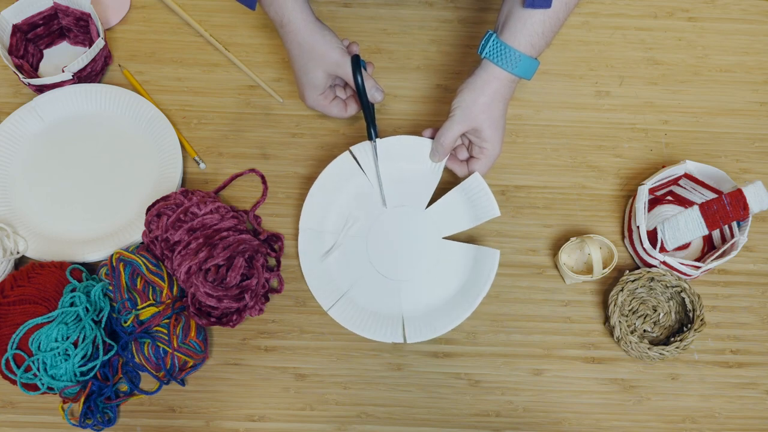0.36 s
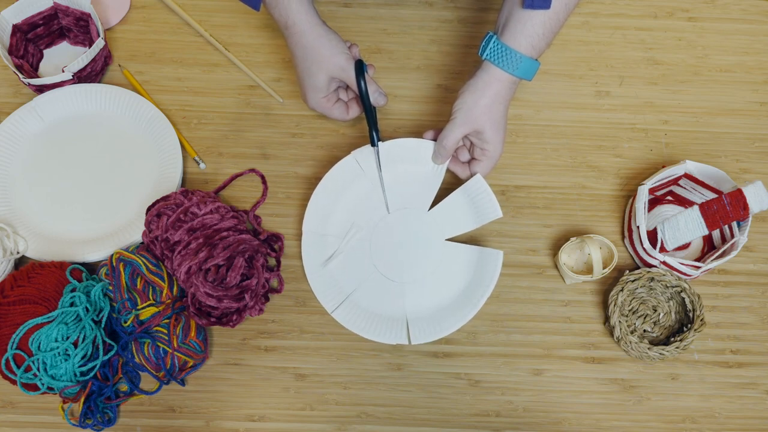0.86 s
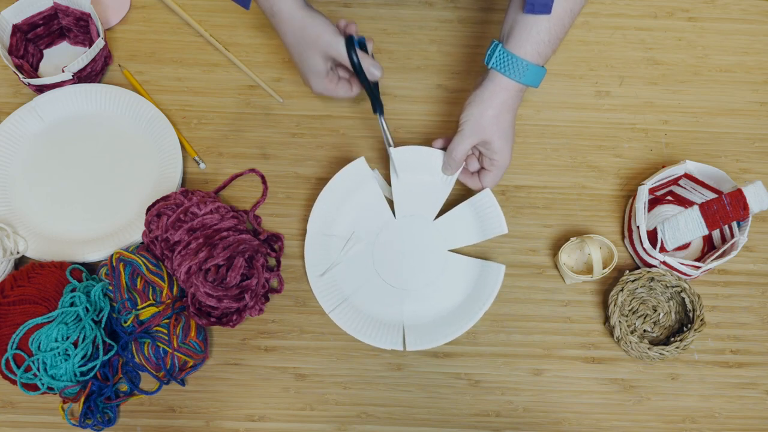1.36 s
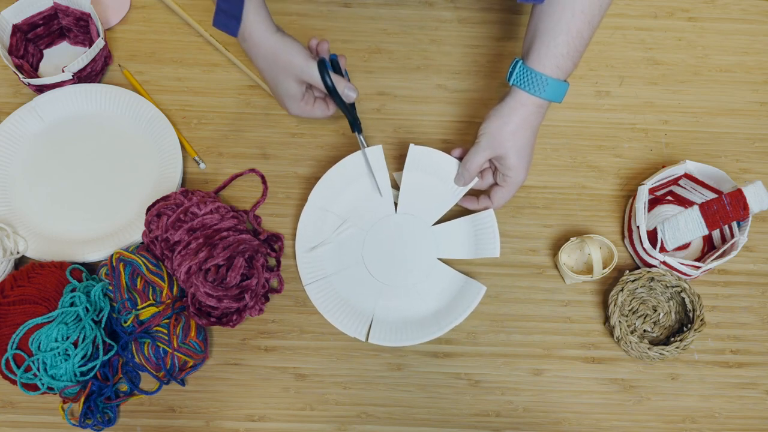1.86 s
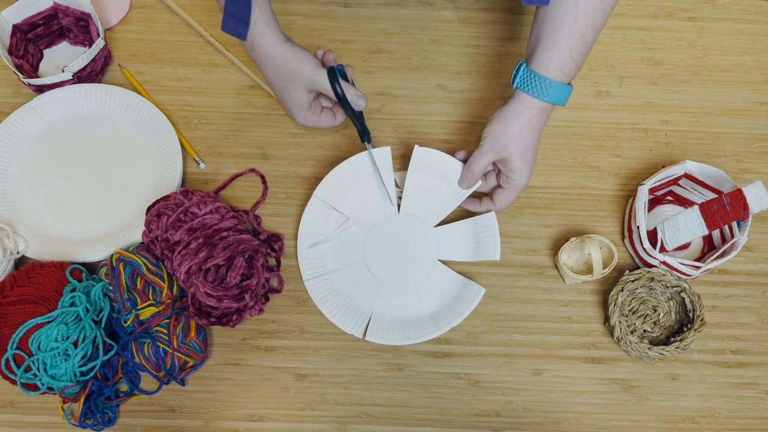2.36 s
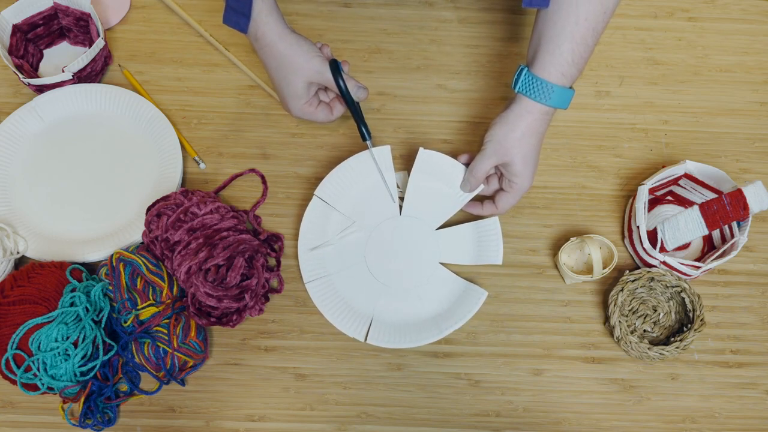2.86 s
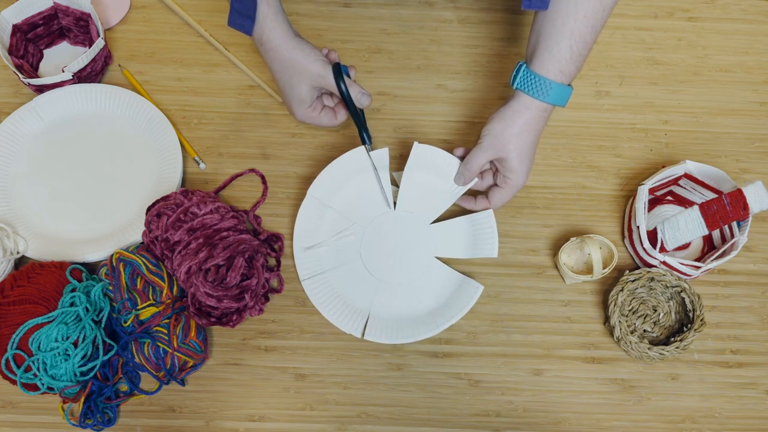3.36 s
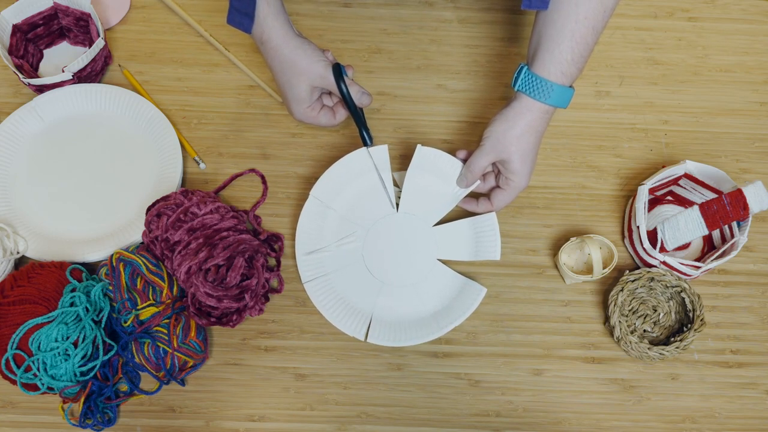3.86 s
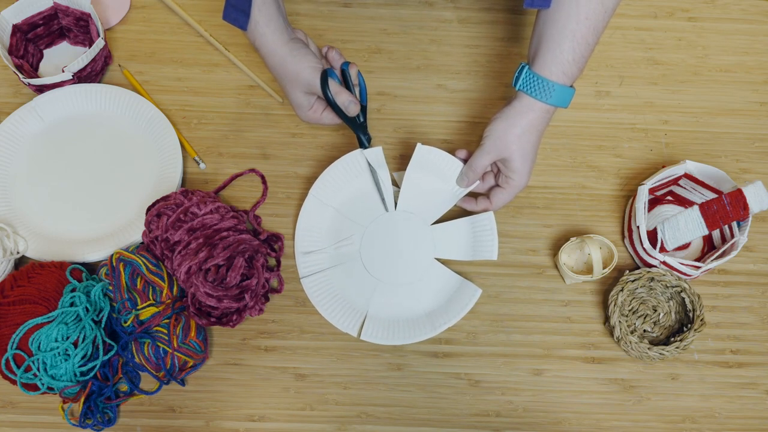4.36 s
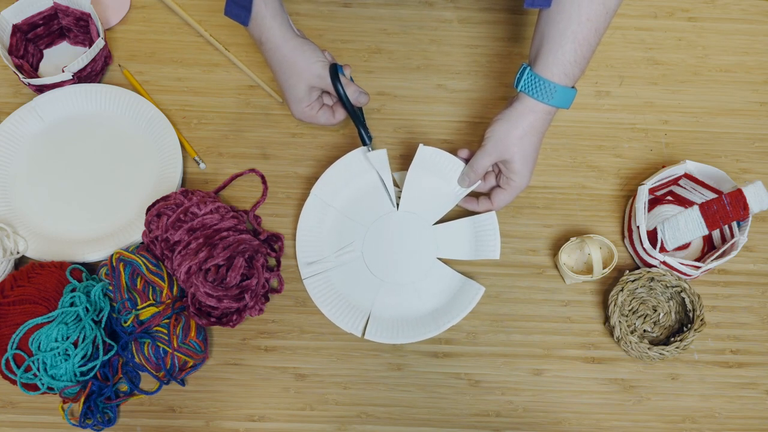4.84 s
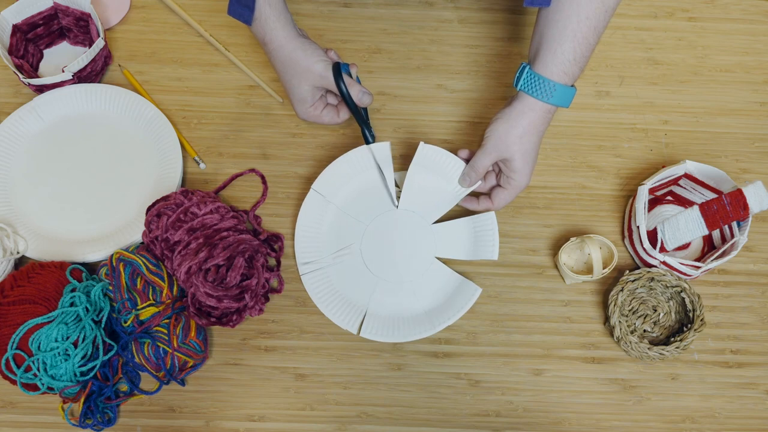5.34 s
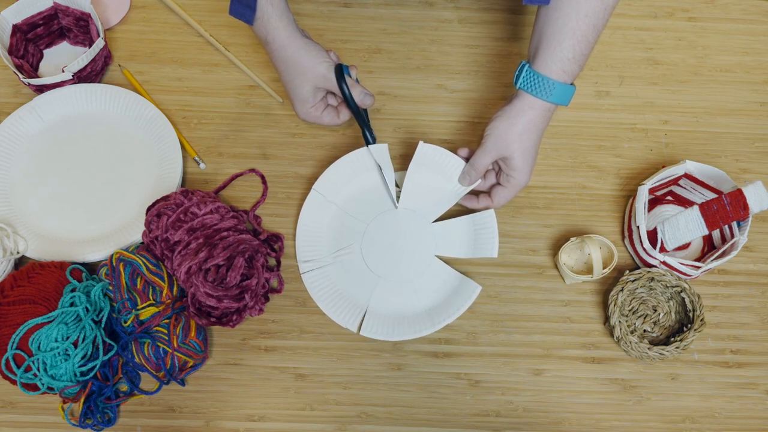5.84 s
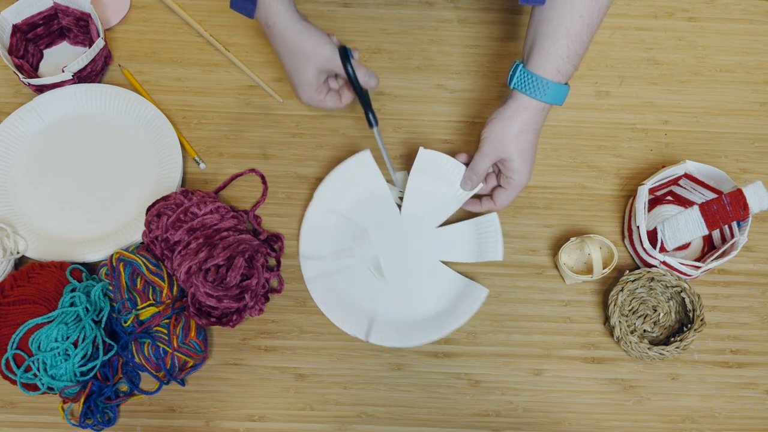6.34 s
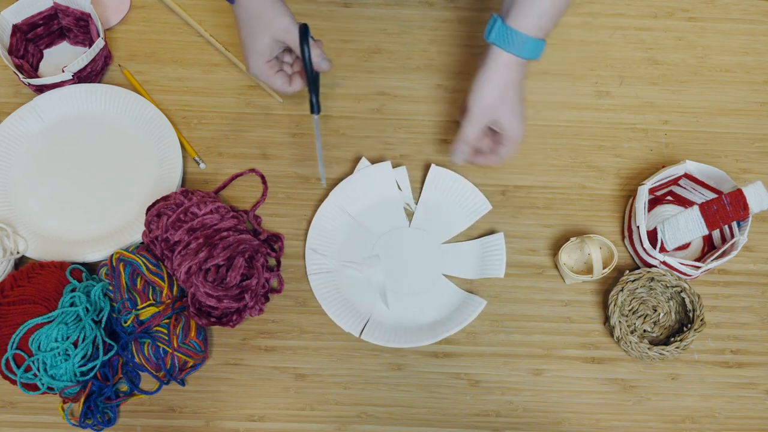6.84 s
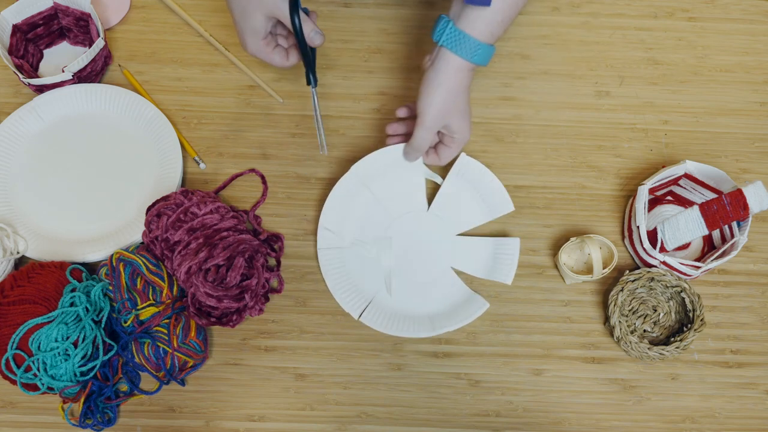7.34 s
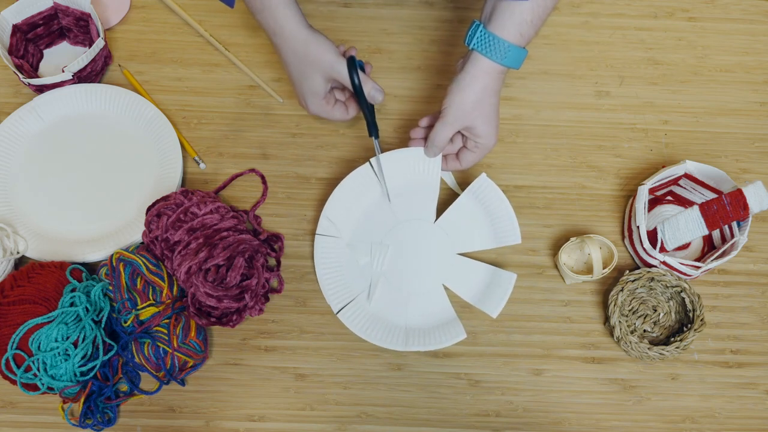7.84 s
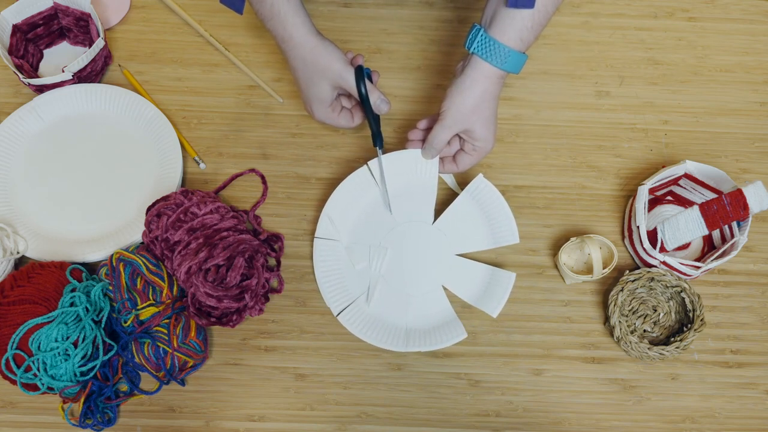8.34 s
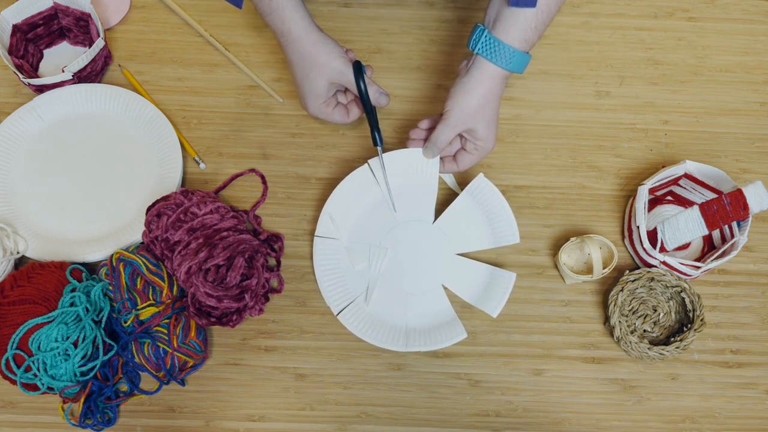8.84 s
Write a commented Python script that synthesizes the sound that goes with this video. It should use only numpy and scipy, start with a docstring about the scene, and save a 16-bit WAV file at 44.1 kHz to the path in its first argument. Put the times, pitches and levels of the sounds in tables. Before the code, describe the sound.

Stiff card is cut in irregular bursts: small fibrous cracks quicken into a hard snip, then dry scraping and handling rustle. Strong isolated snaps come mid-way, and the last seconds are mostly quieter friction with one small table knock and a faint run of crackles. Mono, close microphone, short room reflections, very low background noise and hum.

```python
"""Scissors work through a stiff paper plate on a wooden table in a quiet room.
The blades stick and slip, so the card parts in short cracks: bursts of fibre snaps into resonances.
Between them card rubs on steel and wood: dense grains of friction into the same resonances.
Both excite a short diffuse room tail, over soft table bumps, room noise and a low ventilation hum."""
import sys
import numpy as np
from scipy import signal
from scipy.fft import rfft, irfft, next_fast_len
from scipy.io import wavfile

SR = 44100
rng = np.random.default_rng(int(sys.argv[2]) if len(sys.argv) > 2 else 0)


def amp(db):
    return 10 ** (np.asarray(db, float) / 20)


def wav_out(sig):
    """Save sig, one row per channel (or a flat mono array), as 16-bit PCM at SR to the path in sys.argv[1]."""
    wavfile.write(sys.argv[1], SR, np.round(np.clip(np.atleast_2d(sig).T, -1, 1) * 32767).astype(np.int16))


N = 406161

# plate resonances: (frequency [Hz], width [Hz], relative gain [dB])
BODY_MODES = [(321.6, 80, 0.5), (680, 140, 1.5), (916, 83, 5.5), (1590, 900, 6), (1963, 780, 1.5)]
TREBLE_MODES = [(2860, 1400, 5.5), (4300, 2520, 10), (5000, 870, 10.5), (6370, 1360, 1), (8630, 2800, 1.5)]
# strokes, each until the next: (start [s], low ring [Hz], high ring [Hz], share of chatter [0-1])
STROKES = [(0, 970, 5115, 0.4), (0.13, 1594, 3890, 0), (.7, 1385, 5095, 0.2), (1.228, 1454, 3470, 0.08),
           (2.299, 2178, 3100, 0.3), (2.65, 908, 5100, 0.4), (3.019, 1460, 3300, 0.06),
           (3.551, 871, 5000, .5), (3.758, 2030, 3450, 0.02), (3.9, 1436, 3450, 0.08), (6.1, 900, 4410, 0),
           (6.28, 1640, 3400, 0.12), (6.999, 2300, 4340, 0.05), (7.629, 1490, 3660, 0.19),
           (8.429, 1653, 4900, 0.3), (9.08, 1670, 4300, 0.05)]
# flap beside the blades, rings higher as a cut shortens it:
# (start [s], end [s], start pitch [Hz], end pitch [Hz], ring gain [dB re body])
FLAPS = [(0.633, 0.964, 253, 440, -10), (2.57, 2.68, 720, 960, -5), (2.87, 2.96, 580, 1100, -6),
         (3.6, 3.74, 505, 950, -9), (8.69, 9.03, 620, 720, -11)]
FLAP_SHARPNESS = 13.5  # pitch over width


def rms_one(x):
    """Scale to an rms of 1."""
    return x / np.sqrt(np.mean(x ** 2) + 1e-20)


def top_one(x):
    """Scale to a peak of 1."""
    return x / np.max(np.abs(x))


def resonance(x, hz, width_hz):
    """Two-pole band with gain 1 on top."""
    r = np.exp(-np.pi * width_hz / SR)
    feedback = [1, -2 * r * np.cos(2 * np.pi * hz / SR), r * r]
    return signal.lfilter([(1 - r * r) / 2, 0, (r * r - 1) / 2], feedback, x)


def plate(x, modes, offsets_db):
    """Parallel resonances with alternating signs, each with its own gain offset."""
    out = 0
    for k, ((hz, width_hz, db), offset_db) in enumerate(zip(modes, offsets_db)):
        out = out + (-1) ** k * amp(db + offset_db) * resonance(x, hz, width_hz)
    return out


def drift(rate_hz):
    """Slow random wander of rms 1: noise through a double one-pole low-pass."""
    r = np.exp(-2 * np.pi * rate_hz / SR)
    settled = signal.lfilter([1], [1, -2 * r, r * r], rng.standard_normal(N + SR))[SR:]
    return rms_one(settled)


def swell(t_s, length_s):
    """Smooth rise to a top of 1 after half the length, then a fall."""
    u = 2 * t_s / length_s
    return (u * np.exp(1 - u)) ** 2


def air():
    """Steady room noise of a shaped spectrum and a slightly wavering mains hum."""
    # noise spectrum: (frequency [Hz], relative density [dB per Hz])
    spectrum = [(43, -11.5), (70, -17), (92, -6.5), (111, -13), (134, -8.5), (277, -5.5), (373, -12),
                (560, -18), (775, -16), (6740, -39.5), (16000, -43.5)]
    noise_rms_db = -62.5
    hum_hz, hum_rms_db, waver_db = 100, -73, 0.68
    hz, db = np.transpose(spectrum)
    size = next_fast_len(N)
    bins_hz = np.maximum(np.fft.rfftfreq(size, 1 / SR), 1)
    shape = amp(np.interp(np.log(bins_hz), np.log(hz), db))
    noise = irfft(rfft(rng.standard_normal(size)) * shape, size)[:N]
    sine = np.sqrt(2) * np.sin(2 * np.pi * hum_hz * np.arange(N) / SR)
    hum = sine * amp(hum_rms_db + waver_db * drift(2.5))
    return amp(noise_rms_db) * rms_one(noise) + hum


def bumps():
    """Low rumble when an arm or the plate shifts on the table: swells of narrow-band noise."""
    # bumps: (start [s], rms at the top [dB], twice the rise time [ms], pitch [Hz])
    bump_events = [(2.67, -52.5, 135, 151), (3.148, -52.5, 79, 182), (4.52, -57, 146, 105.6),
                   (8.021, -46.5, 15, 289), (8.119, -56, 120, 100)]
    t_s, out, shake = np.arange(N) / SR, 0, rng.standard_normal(N)
    for start_s, db, ms, hz in bump_events:
        wood = rms_one(resonance(resonance(shake, hz, 80), hz, 80))
        out = out + amp(db) * swell(np.maximum(t_s - start_s, 0), ms / 1000) * wood
    return out


def room(x):
    """Diffuse tail: the power of each band builds up and dies away as noise, the treble sooner."""
    bass_t60_s, twice_as_fast_hz, build_s = 0.2, 18000, 0.00083
    edges_hz, out = 200 * 2 ** np.arange(0, 6.5, 0.75), 0
    build = np.exp(-1 / (build_s * SR))
    diffuse = rng.standard_normal((2, N))
    for k, (low, high) in enumerate(zip(edges_hz, edges_hz[1:])):
        band = signal.butter(2, [low, high], "band", fs=SR, output="sos")
        # -120 in amp() is 60 dB of power
        fade = amp(-120 * (1 + (low / twice_as_fast_hz) ** 2) / (bass_t60_s * SR))
        power = signal.lfilter([1 - build], [1, -build], signal.sosfilt(band, x) ** 2)
        power = signal.lfilter([1 - fade], [1, -fade], power)
        out = out + np.sqrt(power) * rms_one(signal.sosfilt(band, diffuse[k % 2]))
    return out


def chatter():
    """Uneven slips, each with a force of its own; rms 1."""
    slips_per_s, rate_spread_db, force_spread_db = 55, 3.3, 2.2
    turns = np.cumsum(slips_per_s * amp(rate_spread_db * drift(27.75))) / SR
    force = amp(rng.normal(0, force_spread_db, SR))[turns.astype(int)]
    return rms_one(force * np.sin(np.pi * (turns % 1) ** 0.3) ** 6)


def pressure(t_s):
    """Treble and body levels in dB: each rub sets in, runs and lets go; the loudest one rules."""
    # rubs of card on blades or table:
    # (start [s], end [s], treble at start [dB], treble at end [dB], body [dB re treble])
    rubs = [(0.0, 0.102, -50, -51, -1.5), (0.262, 0.423, -46.5, -50.5, -2), (0.48, 0.548, -50.5, -57, 1.5),
            (0.64, 0.925, -63, -58, 4), (0.964, 1.205, -64, -52.5, 6.5), (1.235, 1.375, -42, -48, -5.5),
            (1.43, 1.444, -38.5, -48, -3), (1.536, 1.674, -48, -47, -5.5), (2.06, 2.072, -61, -58.5, -1),
            (2.41, 2.975, -57, -44.5, -4), (2.987, 3.065, -48, -55, -3.5), (3.093, 3.26, -54, -54, 5),
            (3.306, 3.308, -52, -53.5, 8.5), (3.34, 3.53, -62.5, -69, 4), (3.573, 3.781, -60, -43, 4.5),
            (3.932, 4.02, -55, -60, 0), (4.123, 4.197, -61, -50, -3.5), (4.233, 4.258, -51, -46, 4),
            (4.275, 4.4, -56, -59, -3), (4.458, 4.622, -51.5, -55.5, 2.5), (4.695, 4.716, -58, -57, 5),
            (4.975, 5.08, -43.5, -58.5, -6), (5.11, 5.238, -55, -57.5, 4), (5.323, 5.5, -57, -73, 0.5),
            (5.595, 5.73, -63, -64, 0), (6.208, 6.302, -42, -52, 3.5), (6.354, 6.445, -51, -41.5, -1.5),
            (6.522, 6.825, -53, -62.5, -4.5), (7.135, 7.32, -57, -50.5, -12), (7.333, 7.37, -46, -44.5, -5),
            (7.4, 7.5, -52, -48.5, -1), (7.498, 7.544, -51, -40, -5), (7.568, 7.776, -52.5, -68, 0.5),
            (7.797, 7.928, -57.5, -65, -5), (7.956, 8.162, -54, -66.5, -6), (8.196, 8.291, -62, -57, -2),
            (8.31, 8.442, -69, -56.5, -14), (8.476, 8.64, -58, -51, -10), (8.673, 8.875, -55.5, -56, -6),
            (8.91, 9.02, -56, -53, 3), (9.128, 9.153, -44, -41.5, -5.5), (9.166, 9.21, -45, -54, -1.5)]
    press_db_per_s, lift_db_per_s = 699.5, 275
    treble_db, body_db = -69, -82  # faint contact of the held plate
    for start, end, start_db, end_db, tilt_db in rubs:
        course_db = np.interp(t_s, [start, max(end, start + 1 / SR)], [start_db, end_db])
        onset_db = press_db_per_s * np.maximum(start - t_s, 0)
        release_db = lift_db_per_s * np.maximum(t_s - end, 0)
        db = course_db - onset_db - release_db
        treble_db = np.maximum(treble_db, db)
        body_db = np.maximum(body_db, db + tilt_db)
    return treble_db, body_db


def rubbing():
    """Dense clumped grains of friction ring in the plate, the part held free and the flap."""
    grains_per_s, grain_db, clump_db, clump_hz = 6000, 3.38, 1.3, 49
    ticks_per_s, tick_gain_db, tick_hz = 30, 21, 8500  # stray fibres flick off the rubbing edge
    colour_db, colour_hz = 2.2, 9.3  # the bending card shifts the strength of each resonance
    low_ring_db, high_ring_db, flap_rub_db = 12.5, 10.5, 16
    friction_cut_hz = 11000  # friction is duller than a crack
    t_s = np.arange(N) / SR
    treble_db, body_db = pressure(t_s)
    strokes = np.array(STROKES)
    stroke = np.searchsorted(strokes[1:, 0], t_s)
    share = np.clip(strokes[stroke, 3], 0, 1)

    sizes = amp(grain_db * np.minimum(rng.exponential(1, N), 5)) * rng.choice([-1, 1], (2, N))
    grains = sizes * (rng.random(N) < grains_per_s / SR) * amp(clump_db * drift(clump_hz))
    grains = grains * (1 - share + share * chatter())
    flicks = sizes[0] * (rng.random(N) < ticks_per_s / SR)
    ticks = resonance(resonance(flicks, tick_hz, tick_hz / 2), tick_hz, tick_hz)
    ticks = amp(tick_gain_db) * ticks

    shifts_db = [colour_db * drift(colour_hz) for _ in BODY_MODES + TREBLE_MODES]
    body = plate(grains[0], BODY_MODES, shifts_db)
    treble = plate(grains[1], TREBLE_MODES, shifts_db[len(BODY_MODES):])
    for k, (start, low_hz, high_hz, _) in enumerate(STROKES):
        held = slice(round(max(start, 0) * SR), np.searchsorted(stroke, k + 1))
        body[held] += amp(low_ring_db) * resonance(grains[1, held], low_hz, 150)
        treble[held] += amp(high_ring_db) * resonance(grains[1, held], high_hz, 450)
    for start, end, from_hz, to_hz, flap_db in FLAPS:
        held = slice(round(start * SR), round(end * SR))
        pitch_hz = np.interp(t_s[held], [start, end], [from_hz, to_hz])
        # gliding resonance: shift down to 0 Hz, low-pass, shift back
        turns = np.exp(2j * np.pi * np.cumsum(pitch_hz) / SR)
        r = np.exp(-np.pi * from_hz / FLAP_SHARPNESS / SR)
        glide = 2 * (turns * signal.lfilter([1 - r], [1, -r], grains[1, held] / turns)).real
        body[held] += amp(flap_db + flap_rub_db) * glide
    soft = signal.lfilter(*signal.butter(2, friction_cut_hz, fs=SR), treble)
    return amp(body_db) * rms_one(body) + amp(treble_db) * (rms_one(soft) + ticks)


def cracks(size=2600):
    """Each slip tears fibres for a few ms; the burst rings in the torn edge, plate and flap."""
    # cracks: (start [s], treble peak [dB], body peak before flex and flap [dB re treble],
    #          optional torn-edge ring [Hz], else the high ring of the stroke)
    crack_events = [(0.094, -42, 3), (0.126, -27.5, -3.5), (0.367, -48, 11), (0.395, -39, 1),
                    (0.468, -30, -7, 6450), (0.489, -38, -3), (0.6461, -48, 15), (0.7145, -33, -4),
                    (0.749, -36, -1), (0.772, -42, 3), (0.7921, -33, 3), (0.817, -35, 0), (0.842, -43, 3),
                    (0.863, -32, -1), (0.9084, -33.5, -2.5), (0.944, -30, -1.5), (0.9901, -37, 3),
                    (1.0195, -36, 2), (1.0475, -38, 10), (1.0725, -32, 6.5), (1.1, -30, 11),
                    (1.116, -36, 6), (1.122, -34, 4, 3800), (1.1397, -22, -4.5), (1.155, -34, 0),
                    (1.1694, -28.5, -0.5), (1.1947, -1, -10, 6240), (1.4069, -37.5, 7), (1.531, -30, -3.5),
                    (2.755, -36, -4), (2.777, -37, -3), (2.8445, -29.5, -9, 2430), (2.8631, -31, -12),
                    (2.879, -27.5, -7.5), (2.899, -26.5, -11), (2.9197, -35.5, -2.5), (2.937, -32, -6),
                    (2.9645, -18, -15, 8000), (2.9705, -16, -8, 4800), (2.997, -31, -2, 4360),
                    (3.1812, -45, 5.5), (3.39, -54, 10), (3.471, -46.5, 12), (3.6067, -40.5, -1, 2550),
                    (3.742, -14.5, -5, 3240), (3.8096, -28, -0.5), (3.9508, -31, -6, 5900), (4.013, -41, 3),
                    (4.1175, -42, 4), (4.5217, -29.5, -16, 2780), (4.565, -23.5, -3.5), (4.588, -32, 2),
                    (4.6766, -29, -0.5), (4.873, -17, -6, 4350), (4.9054, -16, -10.5, 4670),
                    (4.943, -7.5, -13.5, 6000), (5.098, -48.5, 11), (5.1832, -33.5, 3), (5.217, -50, 15.5),
                    (5.3509, -33.5, -4.5, 2800), (5.569, -47.5, 5), (6.052, -43, -3, 4600),
                    (6.1411, -30.5, -0.5, 5960), (6.1928, -9.5, -2, 7010), (6.2926, -38, 15),
                    (6.332, -39.5, 9.5), (6.392, -35, 13), (6.4191, -27.5, -3), (6.516, -42, 12),
                    (6.548, -46, 7), (6.617, -40, 0), (6.651, -35.5, -6.5), (6.79, -37.5, -16, 2400),
                    (7.265, -38.5, -12, 5970), (7.45, -33, -16), (8.026, -46, 6), (8.293, -44, 1.5),
                    (8.556, -38, -12), (8.621, -39, -11), (8.649, -33.5, -15), (8.719, -37, -9),
                    (8.812, -41, -8), (8.856, -41, -8), (8.887, -41, -6), (8.9015, -33, -2),
                    (8.9245, -37, -4), (8.933, -31, -4), (8.955, -38, -4), (8.974, -28, -9),
                    (8.994, -30, -7), (9.009, -36, 0), (9.019, -36, 0), (9.032, -35, -2), (9.112, -38, -3)]
    tear_ms, tear_spread_db = 3.54, 1.5  # length of a 0 dB tear and its scatter
    weak_ms_per_db, dull_ms_per_db = 0.055, 0.2  # weak tears drag on, dull ones are brief knocks
    fibre_db, luck_db = 3.0, 2.0  # scatter of fibre snaps and of mode gains
    edge_db, held_db, held_width_hz = 6.5, 5, 105
    ring_db_per_db = 0.2  # weak cracks stir the free part and torn edge more than the plate
    dull_ring_db_per_db = 0.4  # dull knocks ring mostly in the free part
    snap_db, flex_db, flex_hz = 24, -10, 430  # main snap over its fibres, flex of the plate, at 0 dB
    out, t_s = np.zeros(N + size), np.arange(size) / SR
    count, modes = len(crack_events), len(BODY_MODES) + len(TREBLE_MODES)
    fibres = rng.standard_normal((count, 2, size))
    fibres = fibres * amp(fibre_db * rng.exponential(1, (count, 1, size)))
    chance = rng.standard_normal((count, modes + 1))
    for (s, db, body_db, *edge_hz), tear, (*luck, lasting) in zip(crack_events, fibres, chance):
        luck = luck_db * np.array(luck)
        loudest_db, dull_db = max(db, db + body_db), max(body_db, 0)
        length_ms = max(tear_ms - weak_ms_per_db * loudest_db - dull_ms_per_db * dull_db, 1)
        length_s = length_ms / 1000 * amp(tear_spread_db * lasting)
        snap = amp(snap_db + db) * (np.arange(size) == round(length_s * SR / 2))
        burst = (tear + snap) * swell(t_s, length_s)

        begun = [stroke for stroke in STROKES if stroke[0] <= s or stroke is STROKES[0]]
        _, held_hz, high_hz, _ = begun[-1]
        ring_db = -ring_db_per_db * loudest_db
        edge = resonance(burst[1], (edge_hz or [high_hz])[0], 420)
        treble = plate(burst[0], TREBLE_MODES, luck[len(BODY_MODES):])
        treble = treble + amp(edge_db + ring_db) * edge
        held = resonance(burst[0], held_hz, held_width_hz)
        held = amp(held_db + ring_db + dull_ring_db_per_db * dull_db) * held
        body = top_one(plate(burst[1], BODY_MODES, luck[:len(BODY_MODES)]) + held)
        body += amp(flex_db + db / 2) * top_one(resonance(snap, flex_hz, flex_hz / 2))
        for start, end, from_hz, to_hz, flap_db in FLAPS:
            if start < s < end:
                hz = np.interp(s, [start, end], [from_hz, to_hz])
                body += amp(flap_db) * top_one(resonance(burst[0], hz, hz / FLAP_SHARPNESS))
        at = round(s * SR)
        out[at:at + size] += amp(db) * (amp(body_db) * body + top_one(treble))
    return signal.sosfilt(signal.butter(2, 190, "high", fs=SR, output="sos"), out[:N])


def scene():
    """Cracks and rubbing in the room, over bumps and air."""
    room_db = -11
    table = cracks() + rubbing()
    return (table + amp(room_db) * room(table) + bumps() + air())[None]


def roll_off(x):
    """The treble ends steeply here."""
    return signal.sosfilt(signal.butter(12, 16530, fs=SR, output="sos"), x)


def record(dry):
    """The microphone rolls off the deepest bass and the top treble."""
    band = signal.butter(4, [42, 14000], "band", fs=SR, output="sos")
    mix = signal.sosfilt(band, dry)
    return roll_off(mix)


dry = scene()
out = record(dry)
wav_out(out)
```